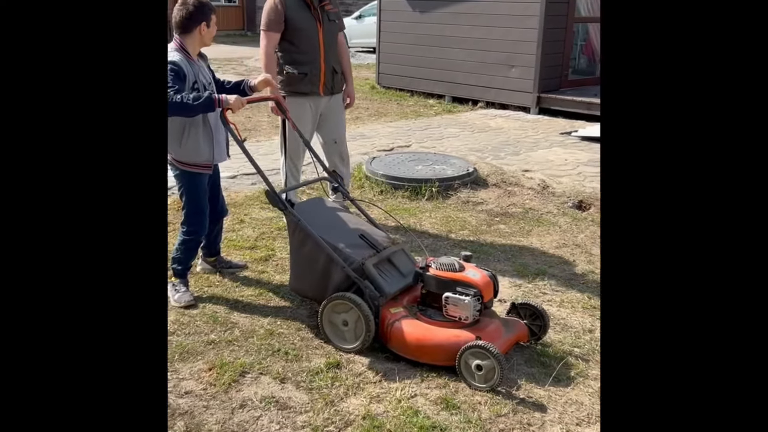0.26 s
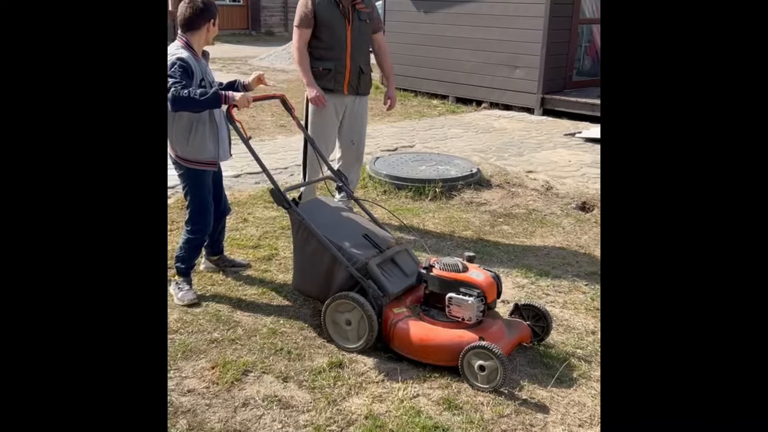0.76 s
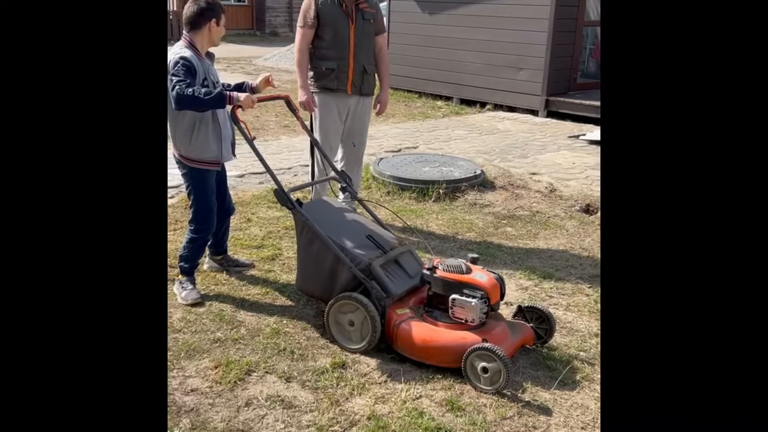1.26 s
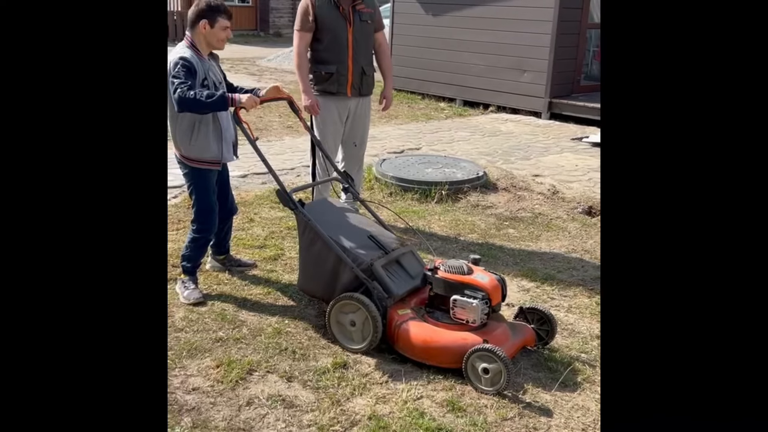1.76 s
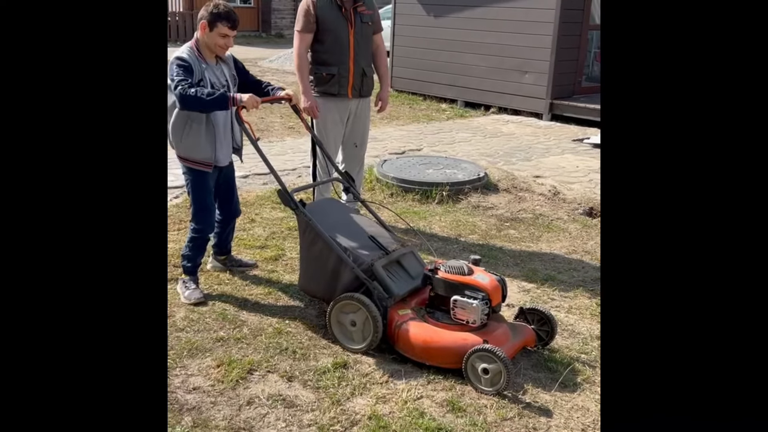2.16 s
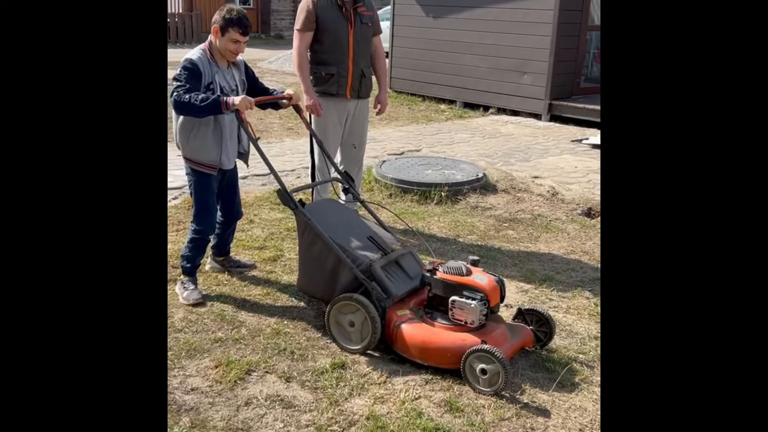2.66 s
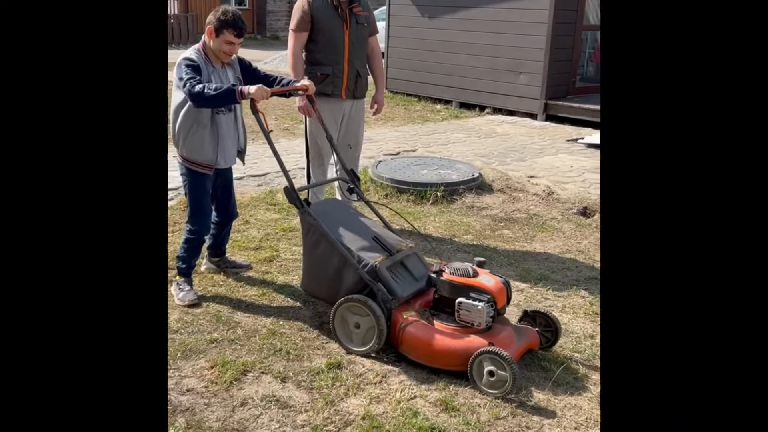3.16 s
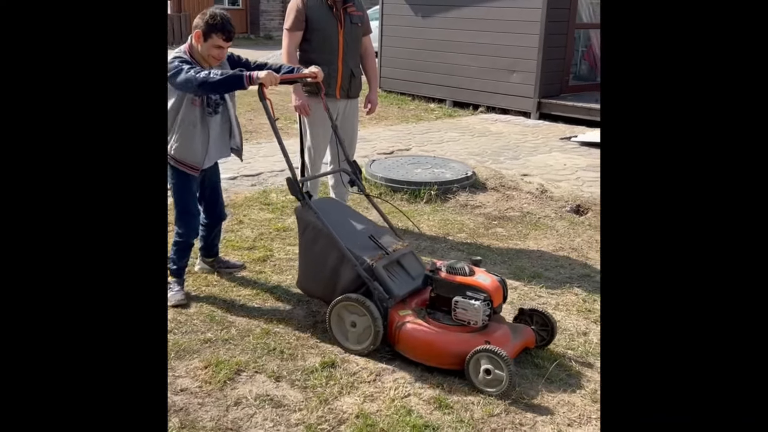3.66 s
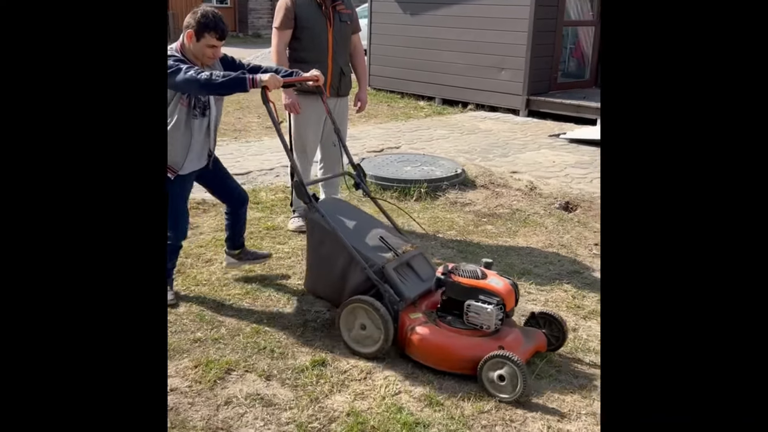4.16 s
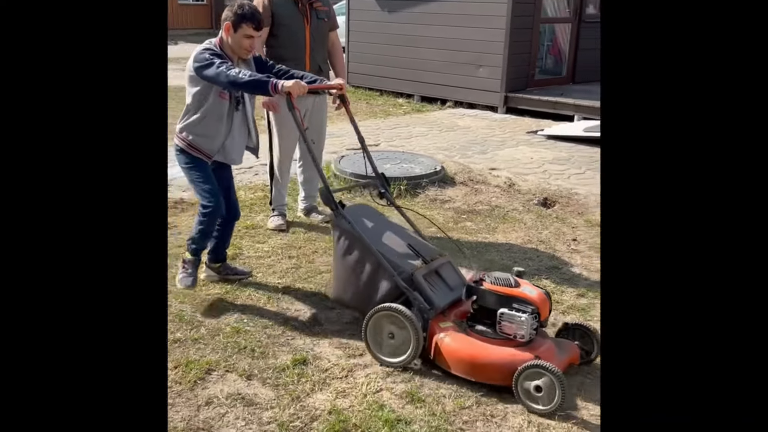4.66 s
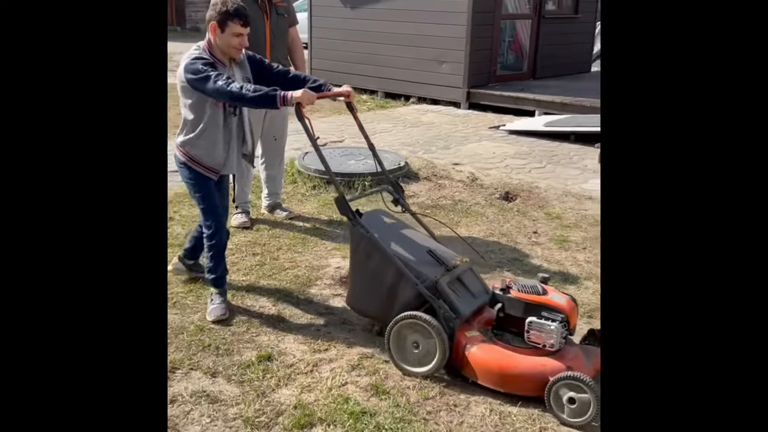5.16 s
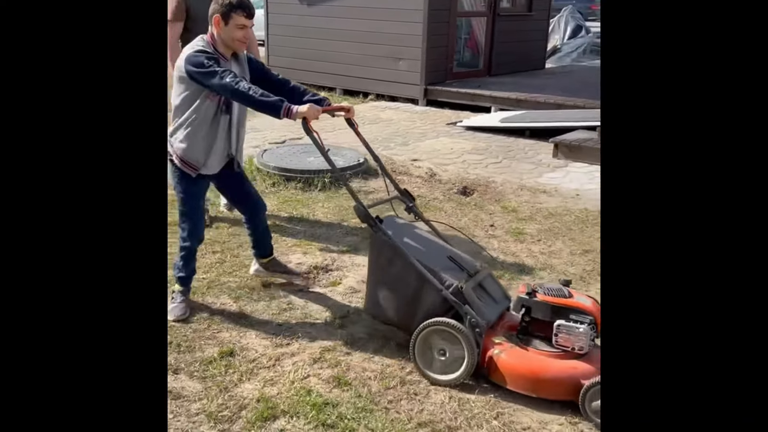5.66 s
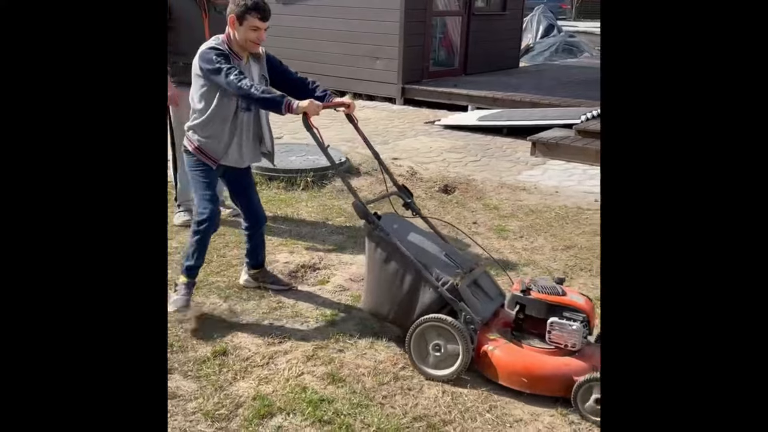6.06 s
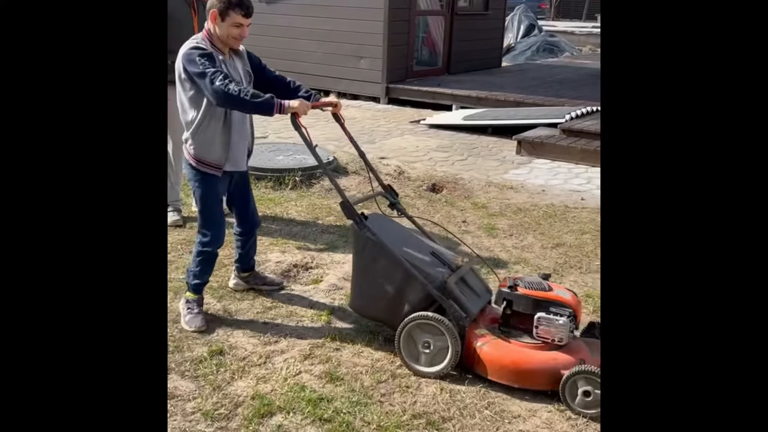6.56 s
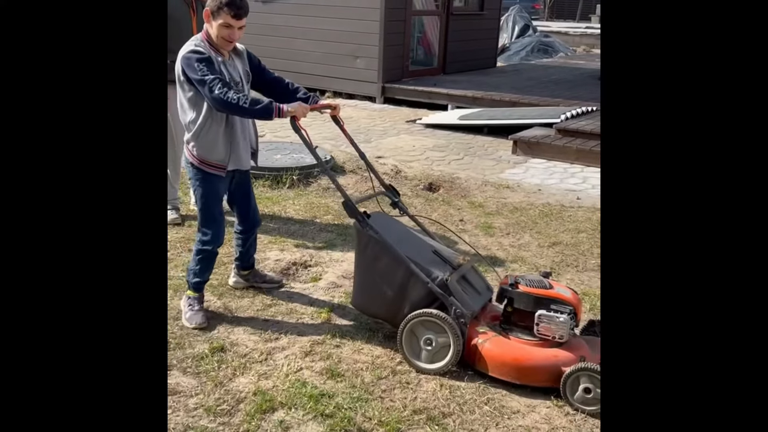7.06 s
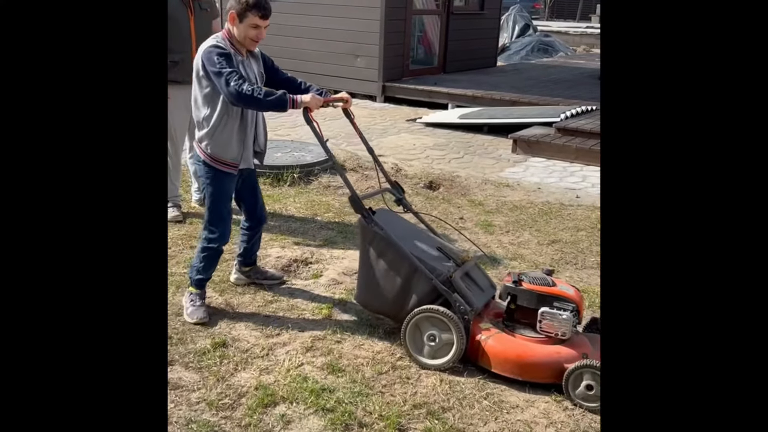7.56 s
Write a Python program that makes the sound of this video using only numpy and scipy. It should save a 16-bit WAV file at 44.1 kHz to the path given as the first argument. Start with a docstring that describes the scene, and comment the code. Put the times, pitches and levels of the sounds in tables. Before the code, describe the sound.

A petrol lawn mower is already running in a yard, about two metres from the microphone, and continues for the whole eight seconds or so. Its steady, slightly wavering engine hum mixes with rapid exhaust pops, metallic valve clatter and the roar of air under the deck. A few light ticks sound early, around 1.4 and 2.4 seconds, with one soft wind bump near 2.2. From about 3 seconds, wind rumbles on the microphone, with low thumps strongest near 3.3, 6.4 and 7.2 seconds. The engine knocks lightly twice near 4.1 seconds, then small stones ping off the metal deck more often. The tone shifts a little as the mower moves and turns away. Near 6 seconds the engine briefly speeds up slightly, and the loudest stone hits at 6.4 seconds. The engine runs on to the end.

```python
"""A single-cylinder four-stroke petrol mower in a yard, two metres from a two-port microphone.
From the start it runs at governed speed: exhaust, blade and fan hum on multiples of the firing rate,
air roars under the deck and the valve gear clatters every cycle. From about 3 s gusts rumble and thump
on the microphone. Near 4.1 s the engine knocks twice; then small stones ping off the deck more often.
Near 6 s the engine briefly races; the loudest stone hits at 6.4 s, and the mower stops, turned away."""
import sys
import numpy as np
from scipy import signal
from scipy.fft import rfft, irfft, next_fast_len
from scipy.io import wavfile
from scipy.ndimage import uniform_filter1d

SR = 44100
rng = np.random.default_rng(int(sys.argv[2]) if len(sys.argv) > 2 else 0)


def digitize_waveform(pressure):
    """Quantize a signal to 16-bit integers and store it at the path in sys.argv[1].

    Rows of a 2-D input are taken as channels; values are limited to [-1, 1].
    """
    field = np.atleast_2d(pressure).T
    bounded = np.clip(field, -1, 1)
    quanta = np.round(bounded * 32767).astype(np.int16)
    wavfile.write(sys.argv[1], SR, quanta)


N = 344421


def amp(db):
    """Decibels to gain."""
    return 10 ** (np.asarray(db) / 20)


def unit_rms(x):
    """Scales to rms 1."""
    return x / np.sqrt(np.mean(x ** 2) + 1e-20)


def spectrum_at(points, hz):
    """Reads a spectrum on a log-frequency axis."""
    f, value = np.transpose(points)
    return np.interp(np.log(hz + 1), np.log(f + 1), value)


def control(points, column=1):
    """One column of a time table, sample by sample."""
    rows = np.array(points)
    return np.interp(np.arange(N) / SR, rows[:, 0], rows[:, column])


def add(mix, s, sound):
    """Mixes a sound in at s seconds."""
    part = mix[round(s * SR):][:len(sound)]
    part += sound[:len(part)]


def drift(rate_hz, count):
    """Rows of slow random wander, rms about 1, one value every 16 samples."""
    steps = rng.standard_normal((count, N // 1024 + 2))
    smooth = uniform_filter1d(steps, max(1, round(SR / 1024 / rate_hz)), axis=1)
    at = np.arange(0, N, 16) / 1024
    return np.array([np.interp(at, np.arange(len(row)), unit_rms(row)) for row in smooth])


def resonate(x, hz, *widths_hz):
    """A resonance at hz, which may glide: shift down to zero, smooth once per width, shift back; rms 1."""
    turn = np.exp(2j * np.pi * np.cumsum(hz * np.ones(N)) / SR)
    for width in widths_hz:
        pole = np.exp(-np.pi * width / SR)
        x = (turn * signal.lfilter([1 - pole], [1, -pole], x / turn)).real
    return unit_rms(x)


def noise(points, patchy_db):
    """Two unrelated rows of coloured noise that share drifting louder and softer patches."""
    hz = np.fft.rfftfreq(1024, 1 / SR)
    a, b, c, d, patches = rng.standard_normal((N // 256 + 5, 513, 5)).T
    patches = unit_rms(uniform_filter1d(uniform_filter1d(patches, 12, axis=0), 8, axis=1))
    colour = amp(spectrum_at(points, hz)[:, None] + patchy_db * patches)
    frames = np.array([a + 1j * b, c + 1j * d]) * colour
    return unit_rms(signal.istft(frames, nperseg=1024, noverlap=768)[1][:, :N])


# Wind at the microphone: (time [s], level [dB])
WIND_LEVEL = [(0, -46), (1.9, -48), (2.3, -44), (2.8, -50), (3.3, -27), (3.8, -39), (4.5, -29), (5.2, -39),
              (5.9, -31), (6.5, -26), (7, -29), (7.5, -38), (7.81, -44)]
# Its colour over the ports: (frequency [Hz], relative level [dB])
WIND_SPECTRUM = [(20, -20), (40, 8), (60, -9), (110, -1.5), (250, -30), (600, -76)]

def breeze():
    """Wind flowing over the microphone makes a lumpy low rumble."""
    return amp(control(WIND_LEVEL)) * noise(WIND_SPECTRUM, patchy_db=0)


# Gusts right on the microphone: (time [s], level [dB], final pitch [Hz], rise time [s])
GUSTS = [(0.11, -30, 78, 0.018), (2.195, -18, 76, 0.023), (3.078, -28, 64.5, .016),
         (3.323, -10.5, 72, 0.013), (3.457, -22, 65, 0.017), (3.578, -17.5, 69.5, 0.026),
         (4.224, -31, 80, .016), (4.445, -17, 78.4, 0.012), (5.75, -34, 81, 0.018), (6.155, -27, 55, 0.015),
         (6.32, -21, 70, 0.017), (6.388, -11.5, 105, 0.014), (6.488, -16, 71, 0.012),
         (7.235, -14, 94.4, 0.021), (7.496, -16.5, 91.6, 0.02), (7.558, -24, 60, 0.016)]

def gust_thumps(sag=.6):
    """Each gust pushes the diaphragm for a few swings, starting the share sag above pitch and sinking."""
    out = np.zeros(N)
    for s, db, hz, rise in GUSTS:
        t = np.arange(0, 6 * rise, 1 / SR)
        push = t / rise * np.exp(1 - t / rise)
        phase = 2 * np.pi * hz * (t - sag * rise * np.exp(-t / rise))
        add(out, s - .005, amp(db) * push ** 2 * np.sin(phase))
    return out


# Sharp metallic ticks, stones on the deck and two engine knocks near 4.1 s: (time [s], peak level [dB])
TICKS = [(0.064, -40), (0.544, -42), (1.386, -29), (1.799, -40), (2.384, -25), (3.748, -28), (4.055, -32),
         (4.098, -36), (4.575, -37), (4.663, -35), (4.794, -40), (4.887, -35), (5.03, -35), (5.098, -38),
         (5.202, -32), (5.231, -34), (5.4, -35), (5.486, -31), (5.617, -38), (5.67, -27), (5.789, -38),
         (5.99, -25), (6.416, -15.5), (6.654, -42), (6.743, -40), (6.829, -36), (7.349, -42)]
# Modes of the deck: (frequency [Hz], relative level [dB], time to fall 60 dB [s])
DECK_MODES = [(1600, -3, .04), (2164, 1, .09), (2800, 4, .03), (3935, -8, .04), (4800, 3, .03),
              (5300, 4, .03), (5800, 1, .03), (6370, -3, .04), (6580, -1, .045), (6730, 3, .055),
              (7100, -1, .035), (7420, -3, .045), (8300, -9, .03), (10200, -7, .03)]

def metallic_ticks():
    """A stone or an engine knock rattles the deck for milliseconds; it rings, detuned anew each time."""
    out, t = np.zeros(N), np.arange(3000) / SR
    for s, peak_db in TICKS:
        detune = 1 + .004 * rng.standard_normal(len(DECK_MODES))
        louder_db = 2 * rng.standard_normal(len(DECK_MODES))
        ring = sum(amp(db + louder_db[k] - 60 * t / t60) * np.sin(2 * np.pi * hz * detune[k] * t)
                   for k, (hz, db, t60) in enumerate(DECK_MODES))
        rattle = rng.standard_normal(len(t)) * np.minimum(t / .0015, 1) * np.exp(-t / .005)
        click = 9 * np.diff(rattle, prepend=0)
        hit = signal.fftconvolve(rattle, ring)[:len(t)] + click
        add(out, s - .001, amp(peak_db) * hit / abs(hit).max())
    return out


# The governor hunting about its set speed: (time [s], firing rate [Hz])
FIRING_RATE = [(0.0, 22.98), (0.24, 23.17), (0.46, 22.86), (0.68, 23.17), (0.93, 23.03), (1.09, 23.24),
               (1.27, 22.92), (1.6, 23.19), (1.98, 22.91), (2.33, 23.23), (2.58, 22.99), (2.85, 23.18),
               (3.06, 22.96), (3.36, 23.26), (3.75, 22.75), (3.93, 22.92), (4.12, 23.19), (4.57, 22.8),
               (4.85, 23.2), (5.12, 22.67), (5.36, 23.25), (5.6, 23.32), (5.78, 23.11), (5.97, 23.64),
               (6.25, 22.9), (6.85, 22.96), (7.05, 23.37), (7.3, 22.74), (7.57, 23.29), (7.81, 23.21)]
# The mower pushed across the yard: (time [s], rolling [0 to about 1], turned from the microphone [0-1])
MOWER_MOTION = [(0, 0.3, 0.14), (1.7, 0.47, 0.26), (3.0, 0.1, 0.2), (3.45, 0.77, 0.6), (4.15, 0.34, 0.13),
                (4.6, 0.4, 0), (4.95, 1, 0.5), (5.2, 0.76, 0), (5.6, 1.1, 0.95), (6.0, 0.92, 0.72),
                (6.4, 0.2, 0.3), (7.0, 0.4, 0.8), (7.81, 0, 0.56)]

def level_db(rule, governed_hz=23.05):
    """A level that follows the engine speed and the motion of the mower."""
    base_db, db_per_hz, rolling_db, turned_db = rule
    overspeed_hz = uniform_filter1d(control(FIRING_RATE), round(.1 * SR)) - governed_hz
    rolling, turned = control(MOWER_MOTION, 1), control(MOWER_MOTION, 2)
    return base_db + db_per_hz * overspeed_hz + rolling_db * rolling + turned_db * turned


def swell(depth_db=.57):
    """Slow random swell, as gain."""
    return amp(depth_db * np.repeat(drift(rate_hz=4, count=1)[0], 16)[:N])


# Knocks in one firing cycle, each against the steady level of four parts:
# (place [cycles], decay [cycles], roar [dB], casing hiss [dB], low ring [dB], high ring [dB])
CYCLE_KNOCKS = [(.1, .03, -1, 2, -6, 3), (.3, .04, 0, -9, -9, -9), (.46, .13, -3, 4, 10, 5),
                (.6, .07, -1, -6, 1, -6), (.74, .05, 0, 1, -3, 14), (.81, .04, 0, 2, 4, 0),
                (.93, .05, -6, -2, 8, 0)]

def knock_gain(cycles, part, uneven_db):
    """Gain for one part: every knock jumps and dies away, each cycle at its own strength."""
    power = np.ones(N)
    strength = rng.standard_normal((int(cycles[-1]) + 2, len(CYCLE_KNOCKS)))
    for k, (place, decay, *db) in enumerate(CYCLE_KNOCKS):
        since = cycles + 1 - place
        jump = amp(db[part] + uneven_db * strength[:, k]) ** 2
        power += jump[since.astype(int)] * np.exp(-(since % 1) / decay)
    return unit_rms(np.sqrt(uniform_filter1d(power, 100)))


# Thin rings of the cooling fins: (frequency [Hz], width [Hz], level against the hiss [dB])
FIN_RINGS = [(5160, 60, -20), (5340, 60, -22)]
# Moments when the fins ring out: (time [s], decay [s], boost [dB])
FIN_FLARES = [(4.056, 0.08, 11), (5.23, .08, 7), (6.712, .12, 6)]

def cooling_fins(hiss, waver_db=2.5):
    """The hiss of the casing sets the fins ringing; the rings come and go."""
    t = np.arange(N) / SR
    waver = np.repeat(drift(rate_hz=3, count=len(FIN_RINGS)), 16, axis=1)[:, :N]
    flare_db = sum(db * (t > s) * np.exp(-np.maximum(t - s, 0) / decay) for s, decay, db in FIN_FLARES)
    return sum(amp(db + flare_db + waver_db * waver[k]) * resonate(hiss, hz, width)
               for k, (hz, width, db) in enumerate(FIN_RINGS))


# Hiss of the engine casing: (frequency [Hz], relative level [dB])
CASING_SPECTRUM = [(900, -50), (1700, -9), (2250, -6), (2600, -3), (3300, -6), (4200, -10.5), (5300, -9),
                   (6300, -12), (7000, -15), (8800, -21), (10000, -18), (10900, -22), (11300, -31),
                   (11800, -42)]
# Its two broad rings: (frequency [Hz], width [Hz], level against the hiss [dB])
CASING_RINGS = [(2620, 300, -6.5), (10050, 900, -13.5)]
# The hiss at two metres: (base level [dB], overspeed [dB/Hz], rolling [dB], turned away [dB])
CASING_LEVEL = (-37.5, 0.5, 2, -1)

def valve_clatter(cycles):
    """The knocks of the valve gear make the casing hiss and ring, and the fins with it."""
    hiss = noise(CASING_SPECTRUM, patchy_db=1.5) * knock_gain(cycles, part=1, uneven_db=2)
    metal = hiss + cooling_fins(hiss)
    for k, (hz, width, db) in enumerate(CASING_RINGS):
        drive = rng.standard_normal((2, N)) * knock_gain(cycles, part=2 + k, uneven_db=3)
        metal += amp(db) * resonate(drive, hz, width, width)
    return amp(level_db(CASING_LEVEL)) * swell() * metal


# Air under the deck: (frequency [Hz], relative level [dB])
AIR_SPECTRUM = [(18, -50), (35, -12), (58, 0), (80, -10), (104, -13), (128, -21.5), (181, -6), (225, -5),
                (265, 0), (290, -10), (325, -13), (400, -11), (430, -7), (461, -1.5), (500, -7), (545, -13),
                (640, -9.5), (860, -9.5), (1000, -7), (1300, -7), (1500, -13), (2070, -16), (2400, -22),
                (3100, -92)]
# Resonance of the hollow under the deck: (time [s], frequency [Hz], relative level [dB])
DECK_HOLLOW = [(0, 1172, -7), (4.6, 1200, -17.5), (5.1, 1080, -29), (5.58, 1075, -11), (5.8, 1050, -14),
               (6.0, 1040, -11), (6.25, 1018, -7.5), (6.9, 1047, -8.5), (7.1, 1085, -12), (7.35, 1110, -11),
               (7.81, 1085, -8)]
# The roar at two metres: (base level [dB], overspeed [dB/Hz], rolling [dB], turned away [dB])
AIR_LEVEL = (-28.5, 0.5, 0.2, 1.6)

def blade_roar(cycles, air_db=1, width_hz=75):
    """The blade whips the air; the deck hollow adds a resonance whose pitch drifts lower and back."""
    air = amp(air_db) * noise(AIR_SPECTRUM, patchy_db=1.08)
    hollow_hz, hollow_db = control(DECK_HOLLOW, 1), control(DECK_HOLLOW, 2)
    hollow = amp(hollow_db) * resonate(rng.standard_normal((2, N)), hollow_hz, width_hz, width_hz)
    gain = amp(level_db(AIR_LEVEL)) * swell() * knock_gain(cycles, part=0, uneven_db=1.5)
    return gain * (air + hollow)


# Sharp pops in one firing cycle: (place [cycles], relative level [dB])
CYCLE_POPS = [(.066, -8), (.2, -8), (.304, -3), (.554, -5), (.708, 1), (.785, 0), (.83, -5), (.938, -7),
              (.996, -5)]
# Resonances of the silencer: (frequency [Hz], width [Hz], level against the hollow [dB])
SILENCER_RINGS = [(610, 110, -5), (1400, 140, -9)]

def exhaust_pops(cycles, rms_db=-36, uneven_db=1.5, hollow_width_hz=230):
    """The same pops return every cycle and ring the silencer and the deck hollow."""
    train = np.zeros(N)
    strength = rng.standard_normal((int(cycles[-1]) + 2, len(CYCLE_POPS)))
    for k, (place, db) in enumerate(CYCLE_POPS):
        at = np.searchsorted(cycles, np.arange(cycles[-1] - 1) + place)
        train[at] += amp(db + uneven_db * strength[:len(at), k])
    rings = [(control(DECK_HOLLOW), hollow_width_hz, 0)] + SILENCER_RINGS
    ringing = sum(amp(db) * resonate(train, hz, width, 1.4 * width) for hz, width, db in rings)
    return amp(rms_db) * unit_rms(ringing)


# Notes that follow speed and motion: (multiple of the firing rate)
MOVING_NOTES = (4, 12, 20, 24)
# Each at two metres: (base level [dB], overspeed [dB/Hz], rolling [dB], turned away [dB])
MOVING_LEVELS = [(-28.5, 6, -2.5, 0.2), (-25.5, -12.5, -2, -1), (-30, -7, 0.5, -4.5), (-47.5, 8, 19, -15)]
# What each gains or loses once the engine races past racing_hz: (slope [dB/Hz])
RACING_SLOPES = [-4, -3, -10, 13]
# Notes that hold their level: (multiple of the firing rate, level [dB])
STEADY_NOTES = [(2, -34.5), (3, -39), (5, -34), (7, -41.5), (9, -34), (10, -42), (11, -42), (13, -46),
                (14, -44), (15, -41), (16, -42), (17, -48), (18, -42), (19, -41), (21, -40.5), (22, -46),
                (26, -51), (28, -52), (34, -52)]
# Two notes with their own course: (time [s], 6th multiple [dB], 8th multiple [dB])
SIXTH_AND_EIGHTH = [(0, -26.5, -41), (3.4, -27.5, -40), (3.8, -26.5, -36), (4.2, -28, -27),
                    (4.65, -27, -35), (5.0, -27.5, -30), (5.2, -26.5, -33), (5.55, -27.5, -26.5),
                    (5.8, -28, -30), (5.95, -29.5, -29.5), (6.1, -28.5, -34), (6.85, -29.5, -37),
                    (7.0, -30.5, -35), (7.81, -30, -34)]
# Smear of the pulse once a shaft turn (even multiples) and once a firing (odd multiples):
# (shift [cycles], spread [turns per multiple squared], starting phase [turns])
SHAFT_SMEAR = (.589, -.036, -.275)
FIRING_SMEAR = (.849, -.055, -.249)

def engine_hum(cycles, racing_hz=23.3, waver_db=.7, wobble_rad=.06):
    """Exhaust, blade and fan: wavering sines on the firing rate, spread in phase to smear the pulse."""
    excess_hz = np.maximum(control(FIRING_RATE) - racing_hz, 0)
    notes = [(k, (level_db(rule) + slope * excess_hz)[::16])  # low notes need only every 16th sample
             for k, rule, slope in zip(MOVING_NOTES, MOVING_LEVELS, RACING_SLOPES)]
    notes += STEADY_NOTES
    notes += [(6, control(SIXTH_AND_EIGHTH, 1)[::16]), (8, control(SIXTH_AND_EIGHTH, 2)[::16])]
    wander = drift(rate_hz=9, count=2 * len(notes))
    out = 0
    for (k, db), wobble, waver in zip(notes, wander[::2], wander[1::2]):
        shift, spread, start = FIRING_SMEAR if k % 2 else SHAFT_SMEAR
        turns = k * (cycles[::16] + shift) + spread * k * k + start
        out += np.sqrt(2) * amp(db + waver_db * waver) * np.cos(2 * np.pi * turns + wobble_rad * wobble)
    return signal.resample_poly(out, 16, 1)[:N]


def scene():
    """The mower in the yard: row 0 is what left and right share, row 1 goes to the right only."""
    cycles = np.cumsum(control(FIRING_RATE)) / SR
    direct = engine_hum(cycles) + gust_thumps()
    echo = np.roll(direct, round(.013 * SR))  # off a shed wall
    in_both_rows = blade_roar(cycles) + valve_clatter(cycles) + metallic_ticks() + breeze()
    return in_both_rows + np.array([direct + exhaust_pops(cycles), echo])


# How alike left and right sound: (frequency [Hz], likeness [0-1])
STEREO_LIKENESS = [(80, .975), (130, .99), (450, .985), (620, .72), (1700, .99), (2250, .6), (2500, .97),
                   (3200, .95), (3700, .2), (4500, .7), (5400, .8), (5800, 1), (6500, 1), (6900, .5),
                   (7300, 1), (8900, 1), (9300, .4), (9700, 1), (11000, 1), (11300, .6), (11500, 1)]
# Phase between left and right: (frequency [Hz], lead of the left [half turns])
STEREO_LEAD = [(60, -.02), (430, -.04), (600, -.1), (900, -.06), (1800, .01), (2150, .29), (2450, .95),
               (2850, .9), (3300, .93), (3650, .8), (3790, .36), (4400, .85), (5050, .52), (5750, 1),
               (6600, 1), (7000, 2), (9000, 2), (9700, 3), (11100, 3), (11500, 4)]
# Stereo balance: (frequency [Hz], left minus right [dB])
STEREO_BALANCE = [(60, 0), (150, 0), (300, .7), (600, .1), (1200, 1.6), (2000, -.5), (2500, 0), (11500, 0)]

def record(dry):
    """Stereo image: likeness, phase and balance of left and right by frequency, in a limited band."""
    low_cut_hz, top_hz = 41, 11850
    size = next_fast_len(N + 4096)
    hz = np.fft.rfftfreq(size, 1 / SR)
    low_cut = hz ** 2 / np.sqrt(hz ** 4 + low_cut_hz ** 4)
    shared, right_only = rfft(dry, size) * low_cut
    likeness = np.clip(spectrum_at(STEREO_LIKENESS, hz), 0, 1)
    # each side takes half of the phase and half of the balance
    skew = np.exp(.5j * np.pi * spectrum_at(STEREO_LEAD, hz)) * amp(spectrum_at(STEREO_BALANCE, hz) / 2)
    left = shared * skew
    right = (likeness * shared + np.sqrt(1 - likeness ** 2) * right_only) / skew
    stereo = irfft([left, right], size)[:, :N]
    low_pass = signal.firwin(511, top_hz, window=("kaiser", 9), fs=SR)
    return signal.oaconvolve(stereo, low_pass[None], "same")


dry = scene()
out = record(dry)
digitize_waveform(out)
```